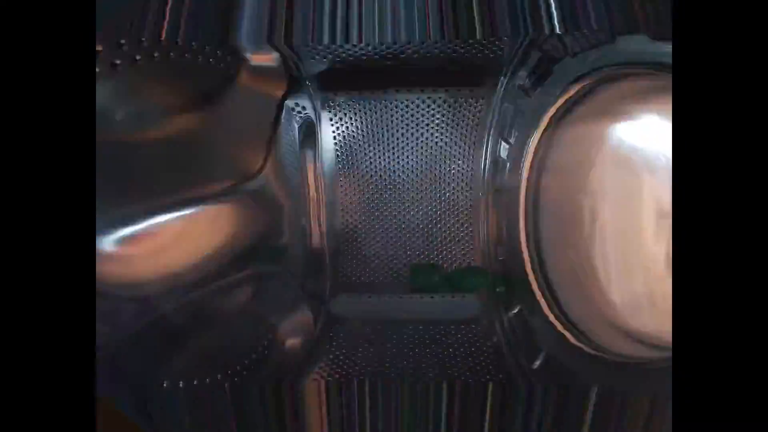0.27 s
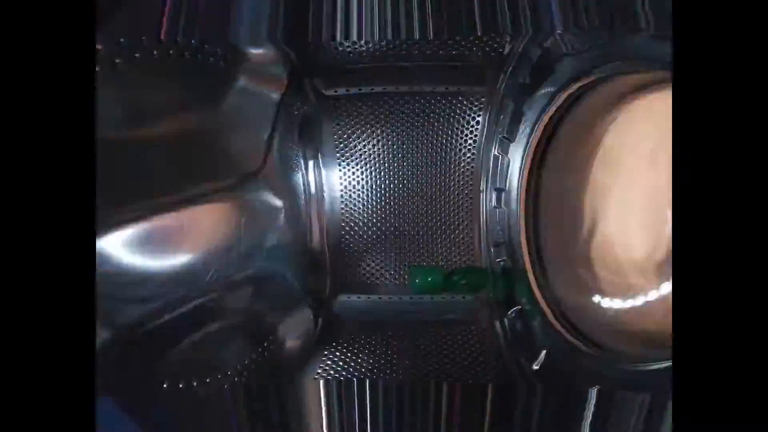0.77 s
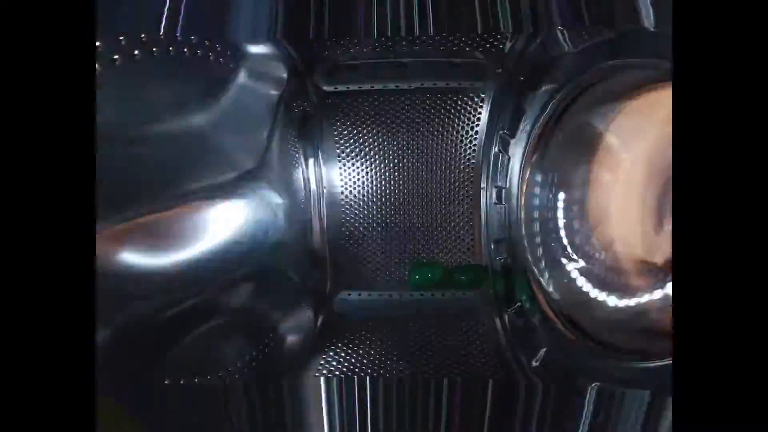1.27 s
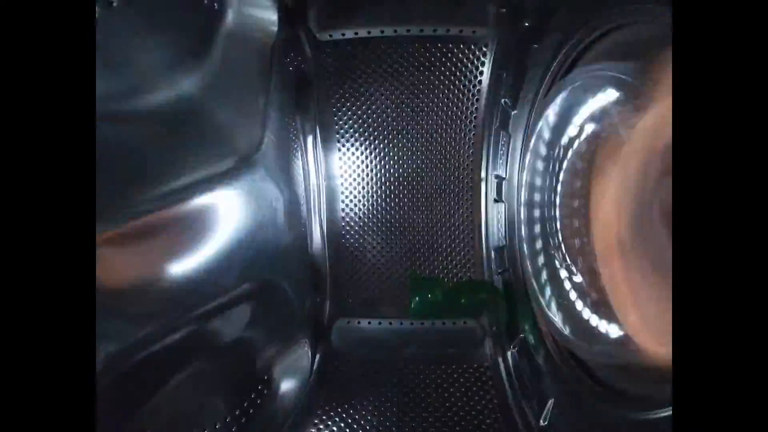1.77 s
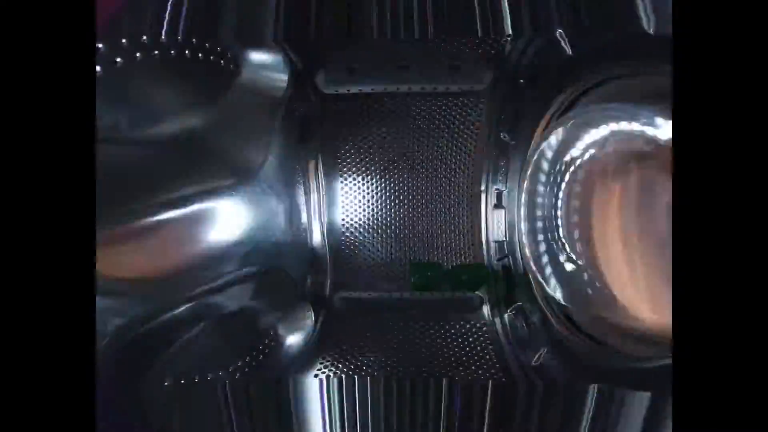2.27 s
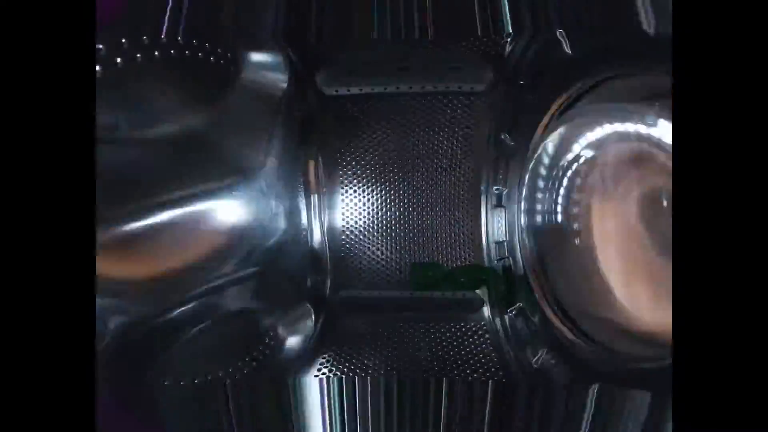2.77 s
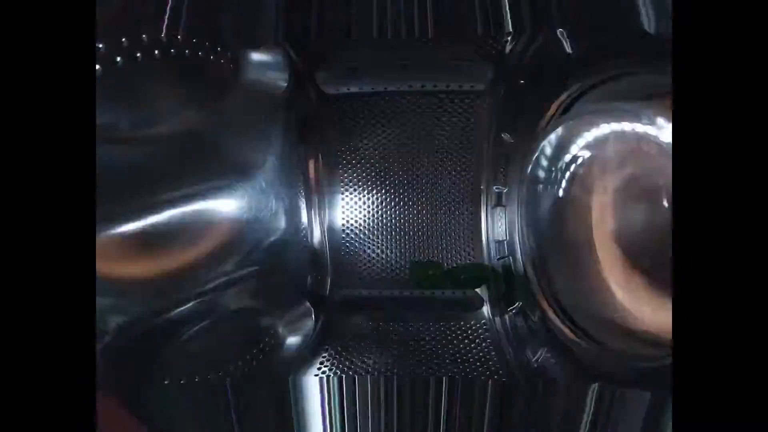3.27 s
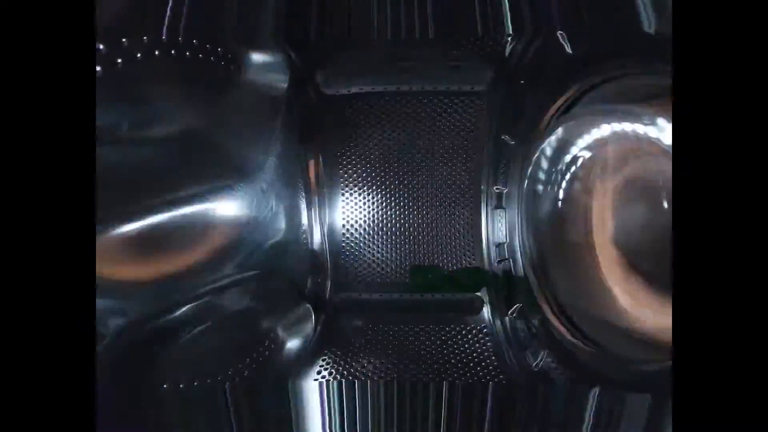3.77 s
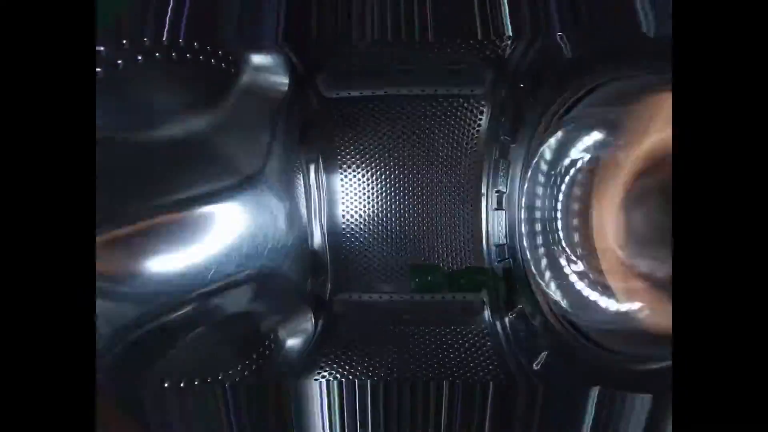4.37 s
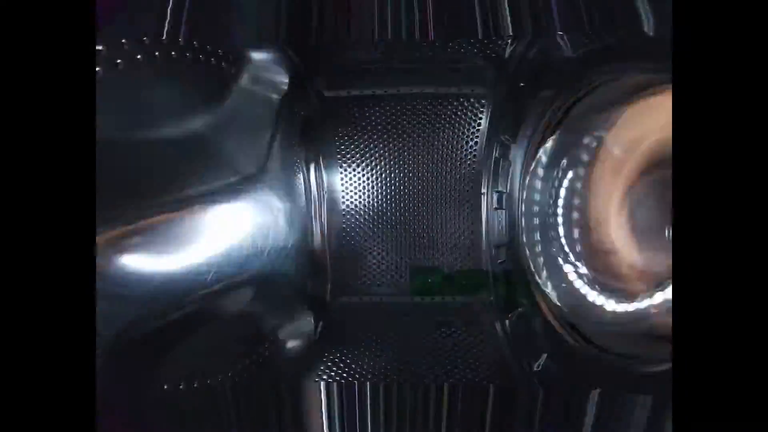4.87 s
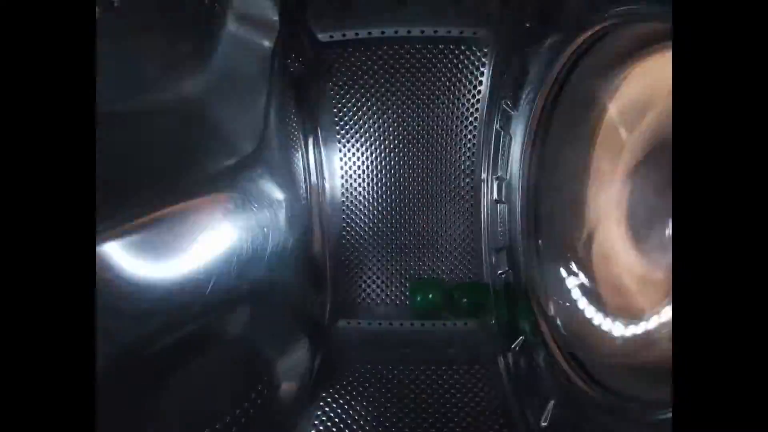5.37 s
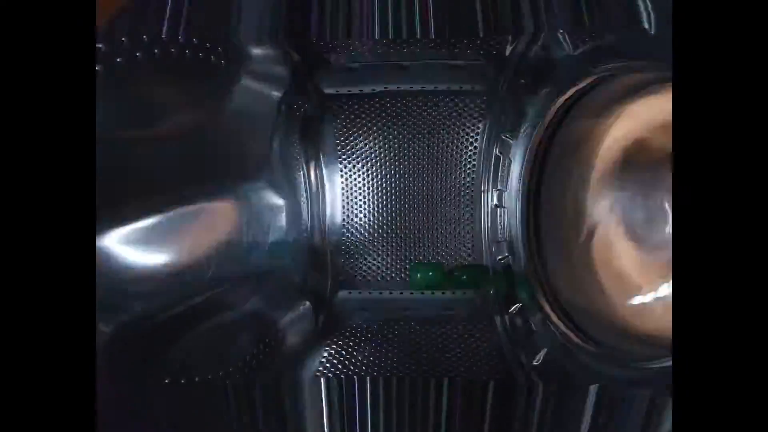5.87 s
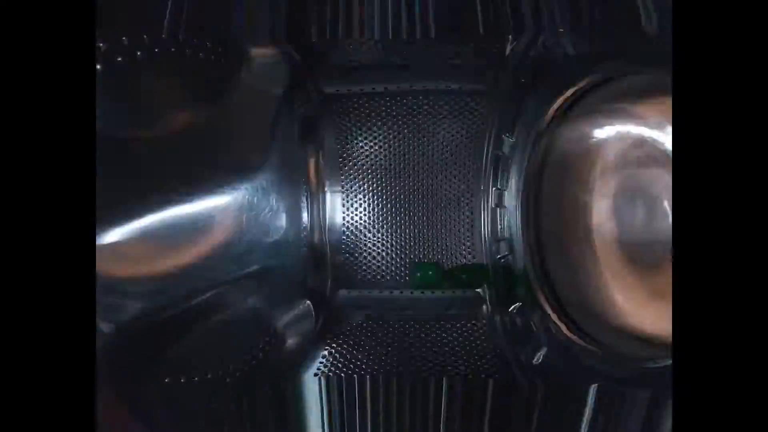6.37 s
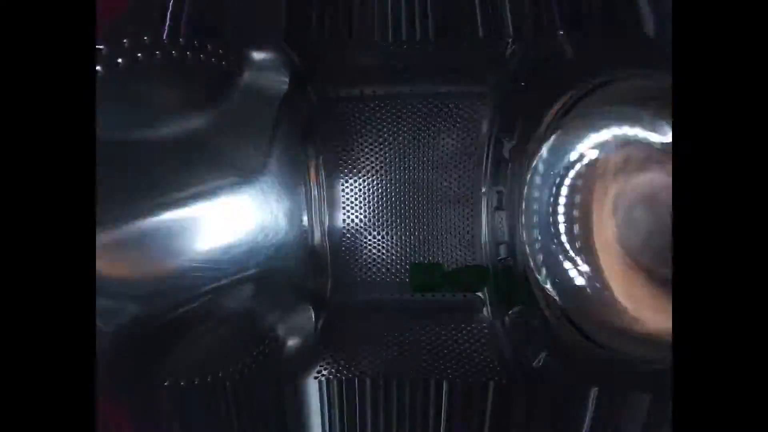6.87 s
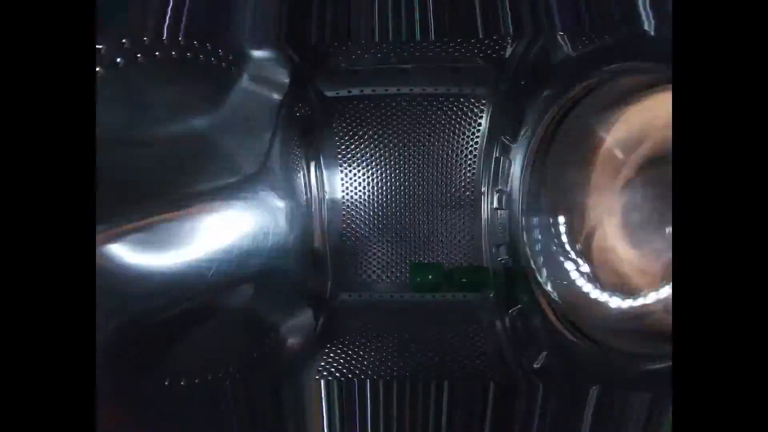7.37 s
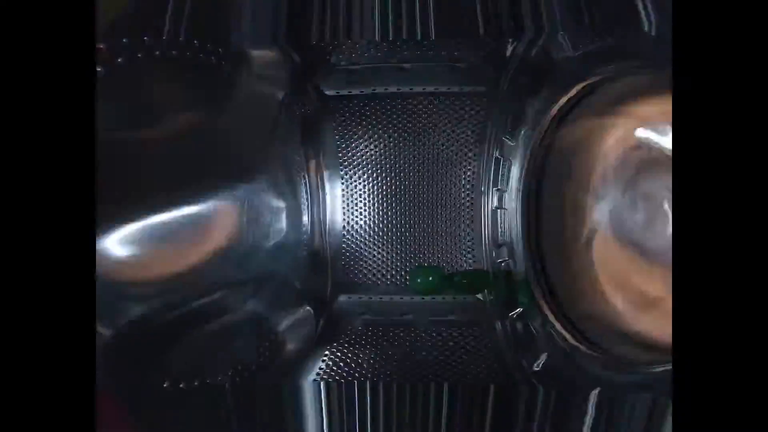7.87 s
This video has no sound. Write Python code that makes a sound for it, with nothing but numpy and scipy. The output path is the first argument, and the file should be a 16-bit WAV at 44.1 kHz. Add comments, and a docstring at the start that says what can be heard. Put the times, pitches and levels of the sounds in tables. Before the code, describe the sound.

A spin cycle heard from within the steel drum, a dense fluttering metallic roar with a steady thin whine, slowly rising in speed, buffeted by gusts.

```python
"""Inside a spinning washing machine

A washing machine spins at about 700 turns a minute and slowly gains speed; the microphone circles in its steel drum.
Noise makes the rushing air; sine tones and repeating patterns make bearings, belt and motor. Both sound
through the tub's resonances, whose main mode booms and beats. Circling makes the motor's whine warble,
and gusts thump the microphone. A fast limiter pumps the rush against the boom."""
import sys
import numpy as np
from scipy import signal
from scipy.fft import rfft, irfft
from scipy.io import wavfile
from scipy.ndimage import uniform_filter1d

SR = 44100
rng = np.random.default_rng(int(sys.argv[2]) if len(sys.argv) > 2 else 0)


def waveform_to_disk(signal):
    """Save audio, clipped to [-1, 1], as 16-bit WAV at the path in sys.argv[1]."""
    frames = np.transpose(np.atleast_2d(signal))
    scaled = np.clip(frames, -1, 1) * 32767
    samples = np.round(scaled).astype(np.int16)
    wavfile.write(sys.argv[1], SR, samples)


N = 357651
TIME = np.arange(N) / SR  # seconds
BINS = np.fft.rfftfreq(N, 1 / SR)  # Hz

BELT_RATIO, BEARING_RATIO = 10.765, 2.986  # cycles per drum turn: motor shaft, bearing
# drum angles, in turns, where the boom peaks and where the microphone rushes toward the motor
BOOM_ANGLE, MOTOR_ANGLE = .42, .78


def amp(db):
    """Turns decibels into gain."""
    return 10 ** (np.asarray(db) / 20)


def evened(x):
    """Scales a sound to rms 1."""
    return x / np.sqrt(np.mean(x ** 2) + 1e-20)


def curves(rows):
    """Draws straight lines between the rows of a time table, giving each column at every sample."""
    seconds, *columns = np.transpose(rows)
    return [np.interp(TIME, seconds, column) for column in columns]


def bumps(rows):
    """Adds up smooth rises or dips in dB, one for each row of start-free centre time, change and length."""
    out = np.zeros(N)
    for centre_s, db, length_s in rows:
        near = abs(TIME - centre_s) < 4 * length_s
        out[near] += db * np.exp(-((TIME[near] - centre_s) / length_s) ** 2)
    return out


def lifts(rows):
    """Adds up resonances and notches, in dB at every frequency."""
    return sum(lift / (1 + (2 * (BINS - centre) / width) ** 2) for centre, width, lift in rows)


def power(x, seconds):
    """Follows the mean square of a sound, smoothed twice over the given time."""
    size = max(int(seconds * SR), 2)
    once = uniform_filter1d(x ** 2, size)
    return abs(uniform_filter1d(once, size)) + 1e-14


def drift(hz):
    """Makes a random wander of rms 1 that fades out above about the given rate."""
    spectrum = rfft(rng.standard_normal(N))
    return evened(irfft(spectrum * np.exp(-(BINS / hz) ** 2), N))


def swing(turns, angle, order):
    """A cosine that comes order times a turn; it peaks at the given angle, in turns."""
    return np.cos(2 * np.pi * order * (turns - angle))


# How fast the drum spins. Each row: time in seconds, speed in turns per second.
SPIN_SPEED = [(0, 11.429), (1, 11.597), (2, 11.749), (3, 11.922), (4, 12.081), (5, 12.237), (6, 12.398),
              (7, 12.575), (8.11, 12.766)]


def drum_speed():
    """The drum's speed in turns per second at every sample."""
    speed, = curves(SPIN_SPEED)
    return speed


def heard_turns(turns, bearing, height, radius_m=0.222, slant=0.88):
    """Drum angle as heard along one path: the circling microphone swings toward and away from the source."""
    sound_speed = 343  # m/s
    sway = radius_m / sound_speed * np.gradient(turns) * SR
    return turns + sway * np.cos(slant * height) * np.sin(2 * np.pi * (turns - bearing))


def racket(turns, ratio, low_hz, high_hz, paths=3, size=16384):
    """A rough pattern that repeats with each turn of a shaft, as dense as white noise of 0 dB per Hz."""
    shaft_hz = ratio * turns[-1] / TIME[-1]
    harmonics = shaft_hz * np.arange(size // 2 + 1)
    inside = (harmonics > low_hz) & (harmonics < high_hz)
    out = np.zeros(N)
    for _ in range(paths):
        pattern = irfft(inside * np.exp(2j * np.pi * rng.random(len(harmonics))))
        shaft_turns = ratio * heard_turns(turns, rng.random(), rng.random())
        out += np.interp(shaft_turns % 1 * size, np.arange(size), pattern)
    return evened(out) * np.sqrt(high_hz - low_hz)


# Tones of bearings, belt and motor.
# Each row: cycles per drum turn, level in dB over one Hz of air noise before the frame colours it.
MACHINE_TONES = [(2.97, 5), (8.98, 10), (9.96, 8), (11.94, 17), (17.97, 8), (18.97, 8), (21.63, 12),
                 (25.03, 9), (26.02, 10), (27.05, 14), (29.62, 18), (29.88, 14), (31.2, 10), (31.88, 14),
                 (32.2, 12), (32.438, 23.5), (33.21, 14.5), (48.65, 11), (50.05, 10), (51.04, 10),
                 (52.04, 8), (53.05, 8), (54.05, 17), (54.67, 9), (55.06, 11), (56.26, 10), (59.44, 16.5),
                 (60.45, 8), (74.66, 9), (75.66, 12), (76.65, 11.5), (80.08, 10), (81.07, 15.5),
                 (81.31, 10), (84.05, 10), (86.48, 13), (87.48, 9), (108.13, 11), (123.33, 12),
                 (146.92, 13), (150.31, 11)]
# The tones travel through the frame, which favours some pitches and weakens others.
# Each row: centre in Hz, width in Hz, lift in dB.
FRAME_RESONANCES = [(621, 35, -4), (689, 55, 2.5), (717, 24, 2), (744, 20, -9.5), (919, 24, 4.5),
                    (920, 40, -4.5), (985, 50, 0.5)]


def excitation(turns, throb=0.08, waver_db=1.26, slip=0.14, armature_db=-6, bearing_db=-8):
    """White turbulence throbs between the boom's beats, joined by motor and bearing racket and unsteady tones."""
    air = rng.standard_normal(N) * np.sqrt(SR / 2)  # 0 dB per Hz
    air *= 1 - throb * swing(turns, BOOM_ANGLE, order=2)
    armature = amp(armature_db) * racket(turns, BELT_RATIO, 850, 3900)
    bearing = amp(bearing_db) * racket(turns, BEARING_RATIO, 420, 3000)
    unsteady = drift(3.2)
    waver = amp(waver_db * unsteady)
    tones = np.zeros(N)
    for order, db in MACHINE_TONES:
        shift = rng.integers(N)  # each tone wavers at its own moments
        phase = 2 * np.pi * (order * turns + rng.random())
        phase += slip * np.roll(unsteady, shift)[::-1]  # slip in radians
        tones += amp(db) * np.sqrt(2) * np.roll(waver, shift) * np.sin(phase)
    through_frame = irfft(rfft(tones) * amp(lifts(FRAME_RESONANCES)), N)
    return air + armature + bearing + through_frame


# Broad colour of the turbulent air. Each row: frequency in Hz, relative level in dB per Hz.
AIR_COLOUR = [(20.0, -40), (40.0, -43), (80.0, -51), (200.0, -56.5), (500.0, -59), (1100.0, -57),
              (1700.0, -61.5), (2700.0, -72.5), (3800.0, -79), (4500.0, -88), (6000.0, -91.5),
              (7200.0, -104.9), (9000.0, -109.3), (12500.0, -121.1)]
# Resonances (+) and notches (-) of tub and drum. Each row: centre in Hz, width in Hz, lift in dB.
TUB_RESONANCES = [(266.7, 39, 6), (390.5, 73, 17.5), (343, 19, 0), (368.6, 13, 3), (410, 9.5, -5),
                  (575, 50, 6), (629, 49, 7.5), (717, 98.4, 13), (770, 31, -2.5), (836.6, 39, 7.5),
                  (894, 35, 9.5), (974.5, 21, 7.5), (1204, 170, 2.5), (1349, 61, 4), (1490, 27, -1.5),
                  (1537, 91, 5), (1711, 18, 4.5), (1888, 100, 4), (2620, 460, 4.5), (2930, 61, -2),
                  (3300, 60, 3), (3780, 250, 1.5), (8500, 3000, 2.5), (11900, 500, -3.5)]


def tub_gain():
    """The air's broad colour, lifted at each resonance and lowered at each notch."""
    hz, db = np.transpose(AIR_COLOUR)
    colour_db = np.interp(np.log(BINS + 1), np.log(hz), db)
    return amp(colour_db + lifts(TUB_RESONANCES))


# The boom swells or drops out briefly.
# Each row: centre time in seconds, change in dB, length from the centre in seconds.
BOOM_SURGES = [(.34, -5, 0.18), (.58, 3.5, 0.07), (.73, -8, 0.045), (1.16, -8, 0.024), (1.3, 0, 0.054),
               (1.62, 1.5, .07), (1.85, -14, 0.011), (2.08, 3, 0.036), (2.2, -3, 0.12), (2.42, 5, 0.032),
               (2.76, -4, 0.064), (3.67, -20, 0.023), (3.77, -3, .058), (3.86, -16, 0.032), (3.93, 3, .04),
               (4.29, -7, 0.018), (4.6, -13, .015), (5.08, 3.5, 0.074), (5.4, 5.5, .05), (6.0, -5, 0.092),
               (6.17, 3, 0.056), (6.38, -7, 0.054), (6.72, 1.5, 0.085), (7.16, 5.5, 0.029), (7.28, -5, .04)]


def boom(mode, turns, beat, surge_db=0.2, surge_hz=7, steady_s=0.09):
    """The tub's main mode runs both ways round; the circling microphone hears one wave lower: two beats a turn."""
    held = signal.hilbert(mode / np.sqrt(power(mode, steady_s)))
    lower_wave = beat * np.exp(-2j * np.pi * 2 * (turns - BOOM_ANGLE))
    both_ways = (held * (1 + lower_wave)).real
    return evened(both_ways * amp(surge_db * drift(surge_hz))) * amp(bumps(BOOM_SURGES))


# Bands of the steel shell whose ringing changes with speed.
# Each row: centre in Hz, width in Hz, full rise in dB, speed in turns per second at half the rise.
SHELL_BANDS = [(236, 60, -2, 12.2), (670, 50, 3, 12.0), (1250, 270, 1.5, 12.33), (2000, 220, 3.5, 12.42),
               (3300, 2100, 2, 12.35), (8500, 1500, 2, 12.3)]
# The rush swells or sinks briefly.
# Each row: centre time in seconds, change in dB, length from the centre in seconds.
RUSH_HEAVES = [(.92, -1.5, .03), (1.02, 1, 0.048), (1.17, 0, 0.021), (1.3, 1, .06), (2.67, -4.5, 0.014),
               (3.87, 0.5, .03), (5.25, -1, 0.22), (6.38, 1, 0.047), (6.61, -3.5, .025), (7.01, 2, 0.043)]
HISS_ANGLE = .68  # drum angle, in turns, where the hiss swells


def rush(air, turns, surge_db=0.58, surge_hz=13, hiss_hz=1900, churn_db=0.8, onset_turns_per_s=.12,
         heave_db=0.83, heave_hz=7):
    """Turbulent air surges; its hiss heaves and churns once a turn; most shell bands ring louder with speed."""
    speed = drum_speed()
    roar = irfft(air, N)
    for hz, width, rise_db, half_speed in SHELL_BANDS:
        haste = .5 * np.tanh((speed - half_speed) / onset_turns_per_s)
        band = irfft(air * np.exp(-((BINS - hz) / width) ** 2), N)
        roar = roar + band * (amp(rise_db * (haste - haste.mean())) - 1)
    hiss = irfft(rfft(roar) * (1 - np.exp(-(BINS / hiss_hz) ** 2)), N)
    hiss_change_db = churn_db * swing(turns, HISS_ANGLE, order=1) + heave_db * drift(heave_hz)
    churned = roar - hiss + hiss * amp(hiss_change_db)
    return amp(surge_db * drift(surge_hz) + bumps(RUSH_HEAVES)) * evened(churned)


def wind(bass, turns, gust_db=0.14, gust_hz=22, throb=0.21, angle=0.11, low_cut_hz=12):
    """Air buffets the microphone once a turn and in short, slight gusts; the very lowest bass is weakened."""
    rumble = irfft(bass * BINS / np.hypot(BINS, low_cut_hz), N)
    buffet = amp(gust_db * drift(gust_hz)) * (1 + throb * swing(turns, angle, order=1))
    return evened(buffet * rumble)


# How the three parts are balanced before brief surges and the limiter; the boom sinks in the later seconds.
# Each row: time in seconds, boom in dB, depth of its beat from 0 to 1, air rush in dB, wind in dB.
DRUM_LEVELS = [(0, -17, .25, -19.5, -26.5), (.8, -16.5, 0.4, -20, -27), (1.4, -17, .3, -18.5, -26.5),
               (2.5, -16.5, 0.47, -19.5, -24), (3.5, -17, 0.56, -19.5, -26), (4.6, -15, 0.5, -19.5, -24.5),
               (5.4, -19, 0.3, -19.5, -26.5), (5.9, -18.5, 0.2, -19, -22), (6.4, -22.5, 0.4, -19.5, -25.5),
               (7.3, -25, 0.5, -19.5, -23), (8.11, -24, 0.4, -19, -21.5)]


def drum(turns, boom_hz=386, boom_width_hz=60, wind_hz=150):
    """Tones swell and fade as they climb through the tub's modes; boom, rush and wind each surge on their own."""
    sound = rfft(excitation(turns)) * tub_gain()
    in_boom = np.exp(-((BINS - boom_hz) / boom_width_hz) ** 4)
    in_wind = 1 / (1 + (BINS / wind_hz) ** 4)
    boom_db, beat, rush_db, wind_db = curves(DRUM_LEVELS)
    booming = amp(boom_db) * boom(irfft(sound * in_boom, N), turns, beat)
    rushing = amp(rush_db) * rush(sound * (1 - in_boom) * (1 - in_wind), turns)
    blowing = amp(wind_db) * wind(sound * in_wind, turns)
    return booming + rushing + blowing


# Whine of the commutator, the motor's ring of contact bars, before the limiter.
# Each row: time in seconds, level in dB, level of its octave in dB.
WHINE_LEVELS = [(0, -56, -72.5), (1.3, -56, -72), (5, -54.5, -74), (6, -55.5, -80.5), (8.11, -55, -82)]
BARS = 40  # commutator bars, so whine cycles per motor turn


def whine(turns, jitter=0.67, echo_jitter=1.6, direct_db=-5, direct_height=0.52, flutter=.45,
          fizz_db=-6.0, fizz_hz=480, count=8):
    """The commutator's tone warbles once a turn as the microphone circles; echoes blur it and brushes add fizz."""
    shake = drift(4.7)
    direct_path = heard_turns(turns, MOTOR_ANGLE, direct_height)
    out = np.zeros(N)
    for harmonic, level_db in enumerate(curves(WHINE_LEVELS), 1):
        radians = 2 * np.pi * harmonic * BARS * BELT_RATIO  # per drum turn
        direct = np.sin(radians * direct_path + jitter * shake)
        direct *= 1 + flutter * swing(turns, MOTOR_ANGLE, order=2)
        echoes = np.zeros(N)
        for bearing in (np.arange(count) + rng.random(count)) / count:
            echo_path = heard_turns(turns, bearing, rng.random())
            echo_shake = np.roll(shake, int(bearing * N))
            echoes += np.sin(radians * echo_path + echo_jitter * echo_shake)
        fizz = amp(fizz_db * harmonic) * evened(drift(fizz_hz) * np.sin(radians * turns))
        mixed = amp(direct_db * harmonic ** 2) * evened(direct) + evened(echoes) + fizz
        out += amp(level_db) * evened(mixed)
    return out


# Strong gusts thump the microphone, before the limiter.
# Each row: centre time in seconds, level at the peak in dB, length from the centre in seconds, pitch centre in Hz.
STRONG_GUSTS = [(.583, -21, 0.02, 100), (.79, -23, 0.034, 42), (1.043, -20, .012, 104),
                (1.497, -20, .025, 35), (1.935, -19, 0.016, 90), (2.034, -20, 0.014, 90),
                (2.137, -23, 0.027, 35), (2.58, -24.5, 0.03, 42), (2.706, -15.5, 0.013, 99),
                (3.341, -21, .012, 100), (4.336, -23, 0.023, 95), (4.781, -22, .012, 90),
                (5.166, -22, .025, 35), (5.345, -22.5, 0.03, 50), (5.735, -27, 0.04, 45),
                (5.812, -20.5, 0.021, 99), (5.98, -19, .03, 35), (6.375, -27, 0.015, 110),
                (6.534, -24, 0.016, 90), (6.659, -24.5, 0.014, 65), (6.87, -22, .02, 40),
                (6.951, -19, 0.018, 105), (7.026, -24, 0.023, 35), (7.175, -18.5, .02, 115),
                (7.253, -23.5, 0.017, 95), (7.505, -26, .022, 60), (7.732, -22, 0.012, 90),
                (7.83, -15.5, .02, 38), (7.969, -18, .016, 85), (8.065, -19.5, 0.021, 48)]


def thumps(spread=1.8):
    """Each strong gust is a short puff of dull noise: a slow shove when low, a knock when higher."""
    out = np.zeros(N)
    for centre_s, db, length_s, hz in STRONG_GUSTS:
        near = abs(TIME - centre_s) < 4 * length_s
        band = signal.butter(N=3, Wn=[hz / spread, hz * spread], btype="band", fs=SR, output="sos")
        puff = signal.sosfilt(band, rng.standard_normal(SR))[-near.sum():]
        swell = np.exp(-((TIME[near] - centre_s) / length_s) ** 2)
        shaped = puff * swell
        # give every puff the same energy for its length, whatever the noise drew
        out[near] += amp(db) * shaped * np.linalg.norm(swell) / np.linalg.norm(shaped)
    return out


def scene():
    """Drum and motor share one rotation; the gusts come on top."""
    turns = np.cumsum(drum_speed()) / SR
    return (drum(turns) + whine(turns) + thumps())[None]


CUTOFF_HZ = 13000


def record(dry, threshold_db=-19, squeeze=0.48, recovery_db_per_s=70, makeup_db=3.5):
    """A fast limiter ducks everything whenever the sum is loud, then a low-pass dulls the top."""
    level_db = 10 * np.log10(power(dry[0], 0.0024))
    # the followed level jumps up at once and falls back at the recovery rate
    fall = TIME * recovery_db_per_s
    followed_db = np.maximum.accumulate(level_db + fall) - fall
    over_db = np.maximum(followed_db - threshold_db, 0)
    limited = dry * amp(makeup_db - squeeze * over_db)  # squeeze: dB of cut per dB over
    lowpass = signal.firwin(255, CUTOFF_HZ, window=("kaiser", 9), fs=SR)
    return signal.oaconvolve(limited, lowpass[None], "same")


dry = scene()
out = record(dry)
waveform_to_disk(out)
```